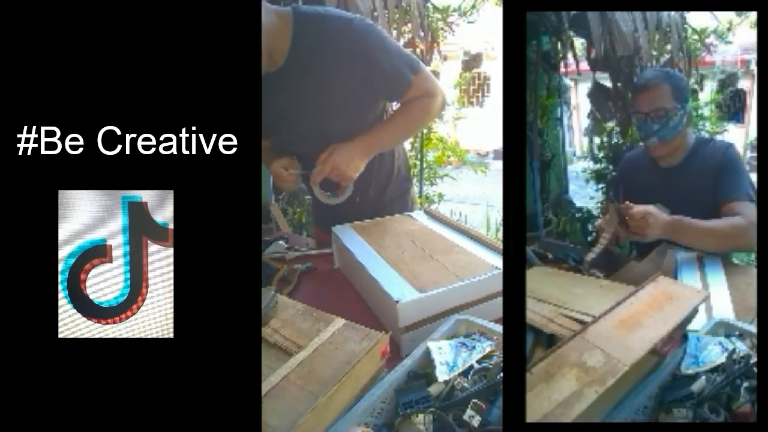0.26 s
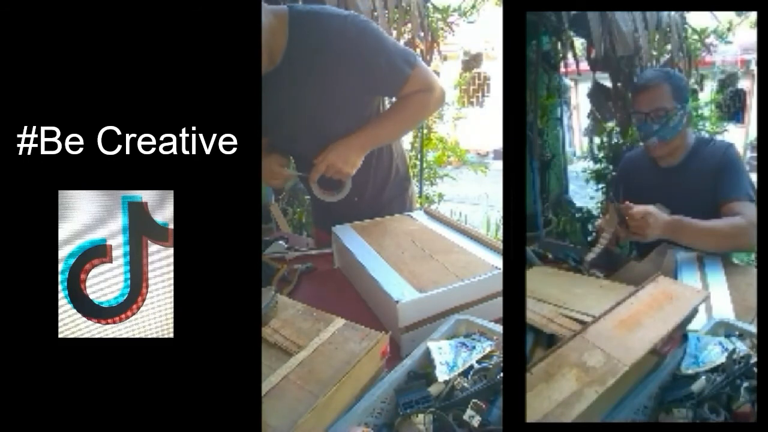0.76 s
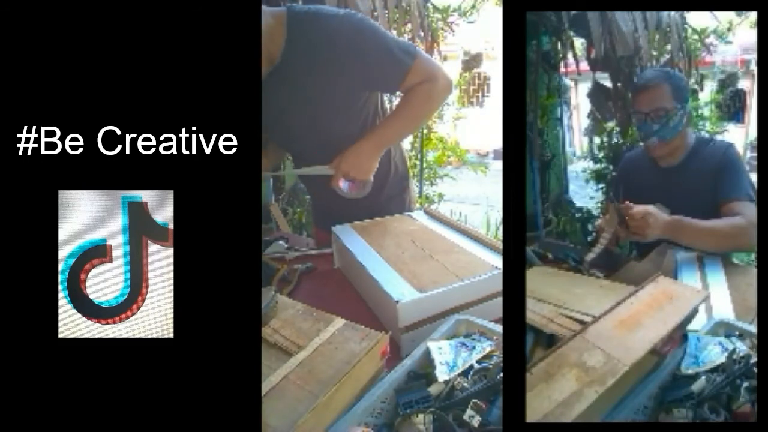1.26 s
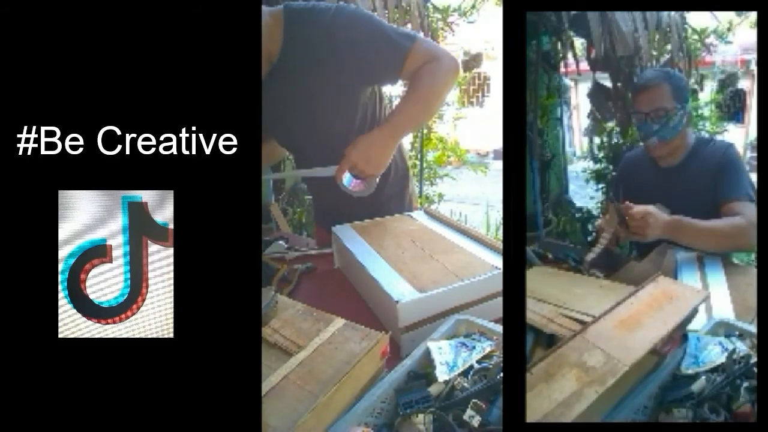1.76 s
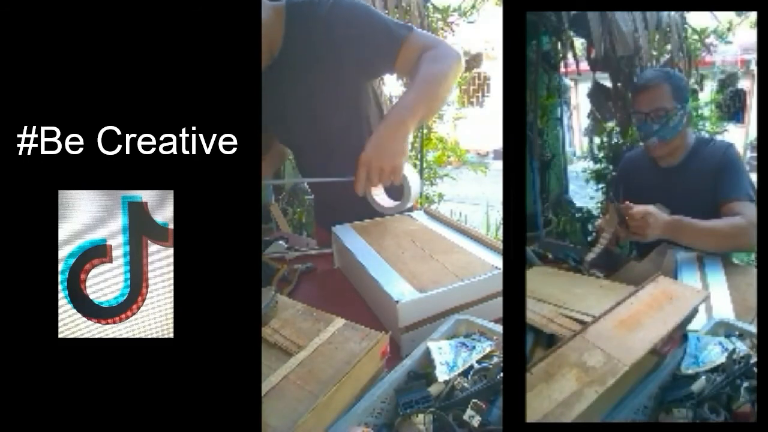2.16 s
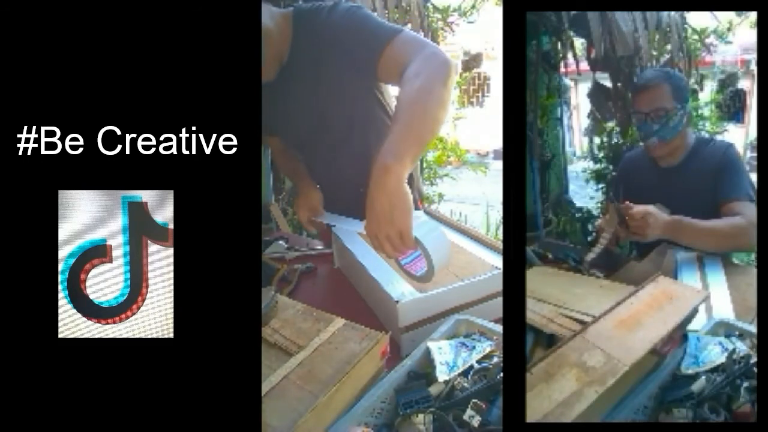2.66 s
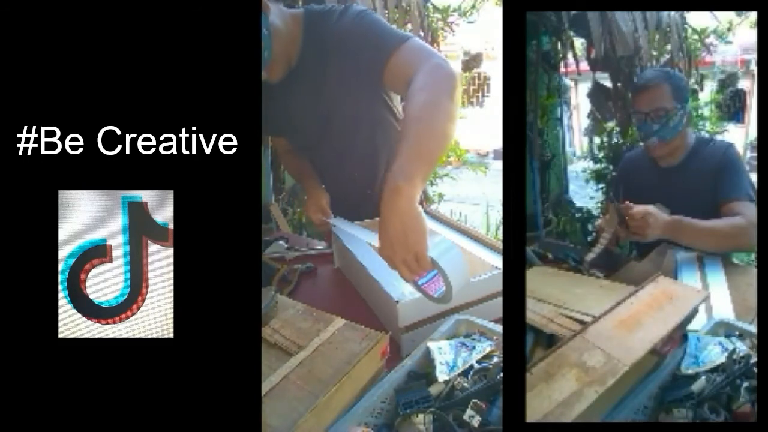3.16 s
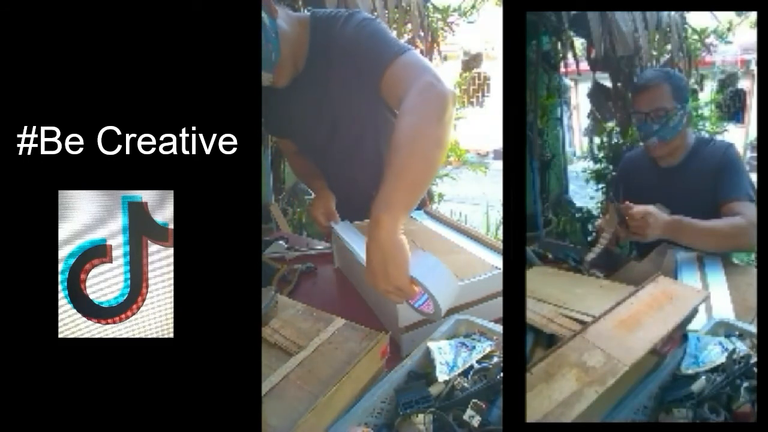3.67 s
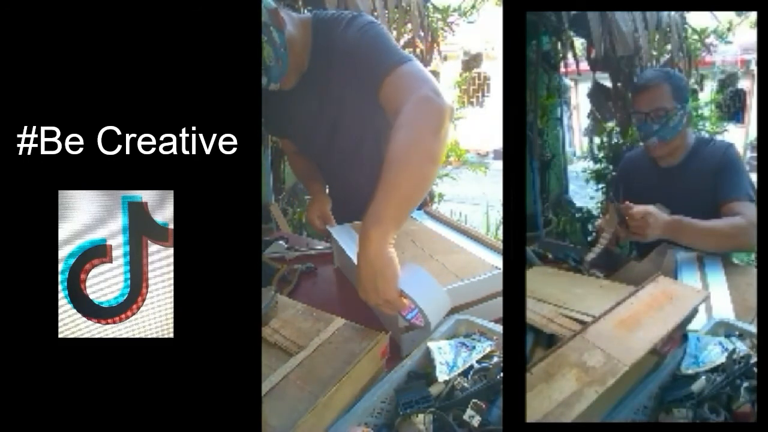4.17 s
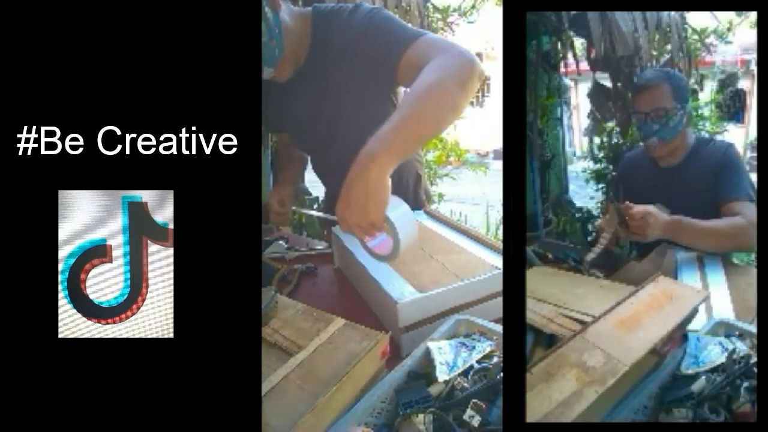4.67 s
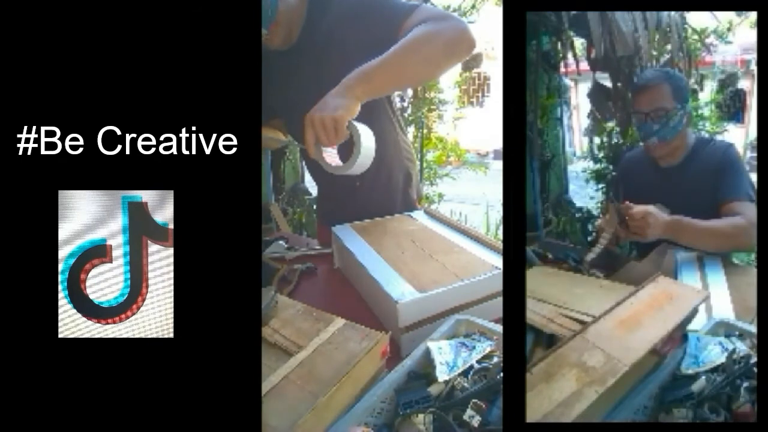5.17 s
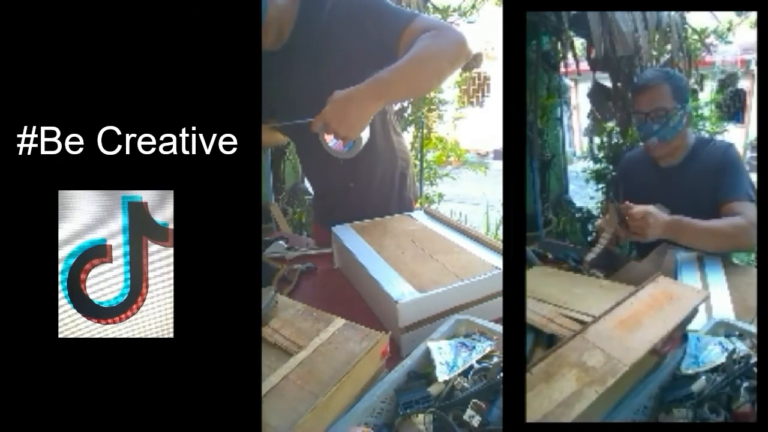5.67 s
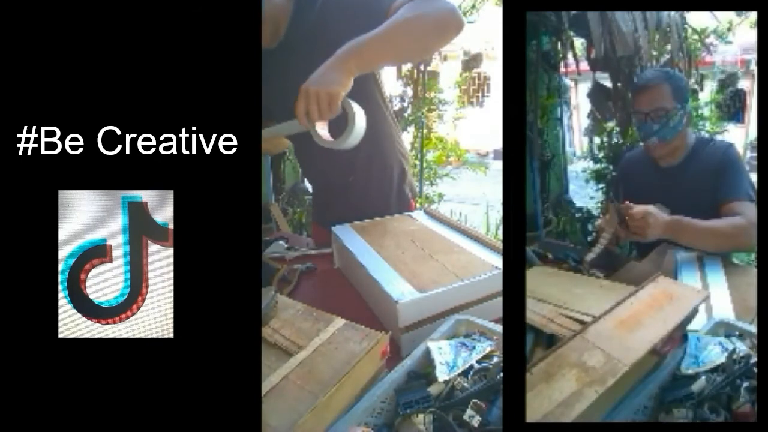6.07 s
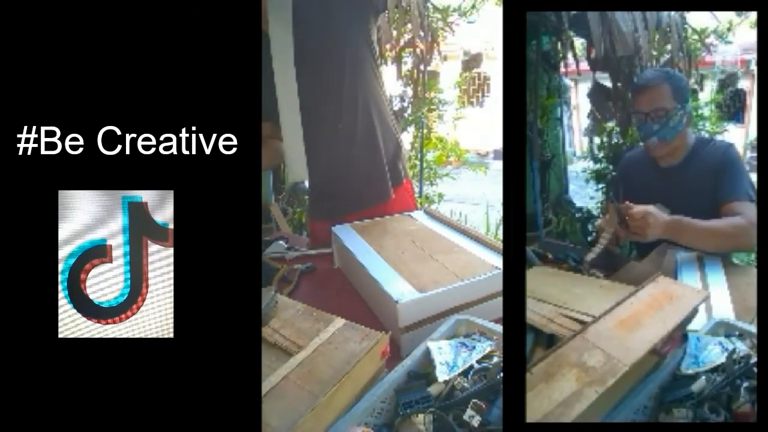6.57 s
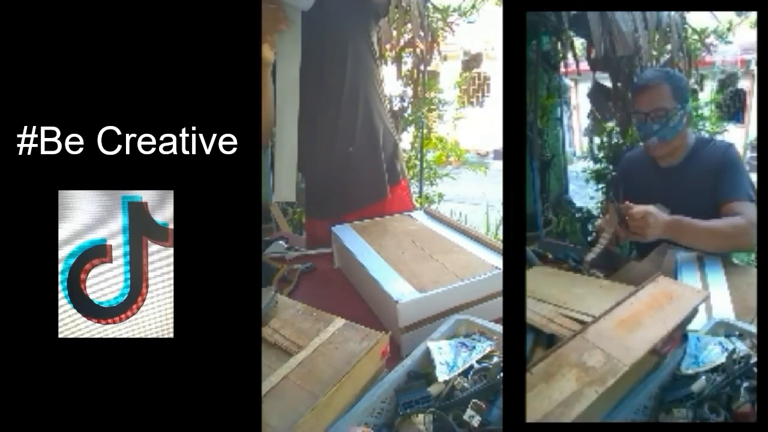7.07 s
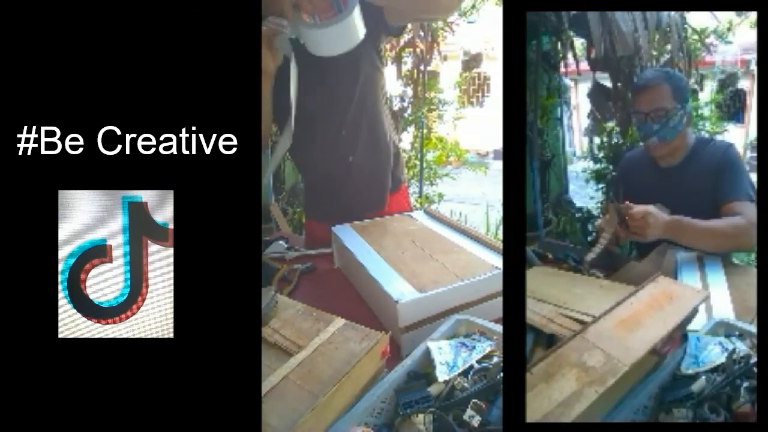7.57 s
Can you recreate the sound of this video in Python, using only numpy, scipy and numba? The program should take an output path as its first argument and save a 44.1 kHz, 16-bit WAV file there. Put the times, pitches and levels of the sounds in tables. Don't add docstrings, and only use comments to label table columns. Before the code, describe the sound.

A nearby rooster's cry breaks off as the tape is picked, then four brisk rips burst from the roll about a third of a second apart. A dull drag and small picks give way to a calmer stretch of wavering distant crows, clucks and thin chirps over low yard hum and a far motor. Hard snaps, one sideways tear and a slow creaking peel finish it, close and dry against the faint open-air background.

```python
import sys
import numpy as np
from scipy import signal
from scipy.io import wavfile
from numba import njit

SR = 44100
rng = np.random.default_rng(int(sys.argv[2]) if len(sys.argv) > 2 else 0)


def boost(x):
    u = np.asarray(x, float) / 20
    return 10 ** u


def wav_record(signal):
    frames = np.transpose(np.atleast_2d(signal))
    bounded = np.clip(frames, -1, 1)
    quanta = np.round(bounded * 32767).astype(np.int16)
    wavfile.write(sys.argv[1], SR, quanta)


N = 344862

# (band_hz, level_db per Hz)
YARD_SPECTRUM = [(20, 3.5), (45, -5), (110, -11.5), (250, -17), (500, -14.5), (900, -14.5), (1300, -20),
                 (1900, -19.5), (2500, -30.5), (4300, -27), (6000, -36), (8000, -55)]
# (time_s, level_db)
YARD_LEVEL = [(0, -48), (.3, -49.5), (1.8, -45), (2.3, -47), (2.9, -51), (3.2, -47.5), (3.6, -47.5),
              (4.0, -46.5), (4.6, -49.5), (5.05, -47.5), (5.2, -54), (5.4, -49.5), (5.9, -52), (6.5, -50),
              (6.9, -51.5), (7.2, -50.5), (7.4, -41.5), (7.82, -48)]
# (centre_s, half_width_s, over_idle_db)
MOTOR_SWELLS = [
    (1.45, .45, 11),
    (3.95, 0.42, 12),
    (6.75, 0.096, 9),
    (7.599, 0.36, 9.5),
]
MOTOR_IDLE_DB = -63.5

# (time_s, pitch_hz, level_db, mouth opening as second_db re first partial)
NEAR_CROW = [(0, 903, -39, 10.5), (.06, 921, -38, 4), (.1, 908, -40, 4.5), (.115, 917, -45.5, 17),
             (.135, 887, -38, 14.5), (.152, 833, -36.5, -1.5), (.19, 689, -51, -3)]
NEAR_HIGH_DB, NEAR_BREAK_S, NEAR_HIGH_FALL_DB_PER_S = -48, 0.11, 1100

# (share of the length, pitch_hz)
SWOOP_SHAPE = [(0, 6300), (.12, 6900), (.3, 6100), (.5, 5250), (.84, 4600), (1, 3900)]
PEEP_SHAPE = [(0, 6600), (.05, 4950), (.4, 4720), (1, 4600)]
DIP_SHAPE = [(0, 4850), (.35, 4570), (.7, 4700), (1, 4720)]
HOOK_SHAPE = [(0, 6500), (.5, 7050), (.8, 6800), (1, 5900)]
SLIDE_SHAPE = [(0, 6000), (.3, 5250), (.72, 4680), (1, 4150)]
DROP_SHAPE = [(0, 4500), (.5, 3700), (1, 2900)]
# (start_s, length_s, pitch_factor, level_db)
SWOOPS = [(2.85, .13, 1, -53), (3.975, .13, .99, -52), (5.37, .13, 1.02, -54)]
# (start_s, length_s, pitch_factor, level_db)
PEEPS = [(0, .1, 1.03, -52), (.43, .1, 1.01, -55), (2.275, .135, 1.02, -52), (2.97, .13, .98, -58),
         (3.36, .14, 1.04, -58), (3.765, .14, .97, -55), (4.675, .115, 1, -56), (1.82, .1, 1.03, -53),
         (7.16, .04, 1.03, -57)]
# (start_s, length_s, pitch_factor, level_db)
DIPS = [(6.6, .16, 1, -56)]
# (start_s, length_s, pitch_factor, level_db)
HOOKS = [(5.97, .09, .99, -68), (3.71, .07, 1.02, -67), (.37, .06, .97, -68), (6.54, .08, 1, -70),
         (.12, .06, 1.03, -64), (3.33, .05, 1.02, -70), (7.02, .055, 1.02, -66), (7.11, .07, 1.02, -69)]
# (start_s, length_s, pitch_factor, level_db)
SLIDES = [(7.058, .095, 1.02, -53)]
# (start_s, length_s, pitch_factor, level_db)
DROPS = [(1.9, .06, 1, -48), (5.81, .055, .99, -46), (3.6, .045, .97, -54), (6.44, .08, .95, -62),
         (4.385, .045, .87, -58), (2.7, .04, .9, -57), (.79, .06, .97, -50), (.3, .06, .95, -62),
         (4.74, .04, .9, -60)]

# (start_s, peak_db, ring_hz, body_db re peak, fizz_db re peak)
PICKS = [(0.035, -23.5, 1850, -12, -20.5), (0.4088, -42, 1760, -1, -10), (2.297, -26.5, 1730, -23, -29),
         (2.7124, -34.5, 1870, 5, -19), (3.3902, -52, 1690, 2, -46), (4.3976, -57, 2157, -2, -34),
         (4.74, -37, 4700, -6, -26), (4.9996, -36, 1590, 4.5, -31), (5.668, -5, 1900, -16.5, -22),
         (5.6814, -8.5, 1890, -7.5, -24), (5.6918, -13.5, 3550, -16, -39), (5.7041, -19.5, 3910, -18, -34),
         (6.164, -17, 2980, -2.5, -21), (6.47, -41, 1652, -10, -40)]
PICK_CYCLES = 56

# (start_s, length_s, start_hz, end_hz, level_db)
CLUCKS = [(2.21, .14, 1000, 1050, -47.5), (2.23, .17, 1680, 1640, -59), (2.47, .08, 450, 440, -49),
          (1.83, .14, 2000, 1950, -57), (3.22, .09, 460, 450, -50), (3.37, .26, 940, 915, -43.5),
          (3.3, .27, 3660, 3600, -69), (3.13, .26, 2310, 2270, -61), (3.64, .14, 2430, 2460, -63),
          (3.9, .2, 1960, 2040, -63), (3.0, .15, 740, 745, -58), (6.42, .16, 1400, 1500, -63),
          (6.3, .1, 1360, 1350, -63), (3.32, .58, 560, 550, -59), (3.99, .11, 460, 440, -50),
          (4.5, .4, 560, 555, -58.5), (4.95, .2, 900, 1080, -57), (6.28, .1, 1170, 1170, -59.5),
          (6.72, .18, 1460, 1430, -60), (6.5, .28, 2060, 2030, -68), (.35, .13, 560, 550, -58.5),
          (7.3, .25, 900, 880, -52), (4.45, .06, 310, 300, -53), (4.78, .05, 300, 290, -53),
          (2.6, .08, 470, 450, -56), (3.4, .07, 470, 450, -53), (3.62, .45, 1040, 1050, -61.5),
          (1.55, .05, 1850, 1850, -52), (2.5, .15, 1980, 1950, -66)]

# (start_s, attack_s, hold_s, crackle_db, swell_db over the hold)
PULLS = [
    (.529, 0.011, 0.055, -16.5, 3),
    (.887, 0.0059, 0.062, -15.5, 2.5),
    (1.225, 0.0062, 0.093, -16, 3.5),
    (1.591, .004, 0.066, -21, 8.5),
    (7.197, 0.016, 0.029, -9.5, -5),
]
# (mode_hz, width_hz, level_db)
ROLL_MODES = [
    [(1496, 76, -6), (2070, 570, -8.5)],
    [(2430, 150, -6), (2880, 180, -0.5), (3310, 210, -8)],
    [(3710, 170, -3.5), (4240, 140, -12), (5580, 540, -11), (6220, 680, -9.5)],
]
# (low_db, middle_db, high_db, fizz_db, fizz_flare_s)
GRIP = [(-2.5, -5.5, -4, -21.5, 0.032), (-6.5, -6.5, -8.5, -21.5, 0.035), (-2, -3, -5, -19.5, 0.057),
        (-0.5, -5.1, -1, -24.5, 0.044), (-3, -4, 3.5, -20.5, 0.047)]
# (first_db, lead_in_db re boom, first_end_hz, second_db, second_hz)
STRIP = [(-18.5, -5.5, 265, -12.5, 900), (-13, -14, 405, -11.5, 760), (-15, 0.5, 253, -13, 900),
         (-18, -12, 222, -18.5, 965), (-30.5, -14, 375, -26.5, 1250)]
FIZZ_TOP_HZ = [15500, 15500, 15500, 15500, 11800]
PULL_ONSET_DB, PULL_RELEASE_S, PULL_RELEASE_DB = -7.5, 0.0074, -32
RELEASE_SHARE = 0.28
RISE_DB_PER_S = 1202
TAUT_S, STRIP_START_HZ = 0.037, 446
FIRST_FALL_DB_PER_S, SECOND_FALL_DB_PER_S, SECOND_LEAD_DB = 165.5, 336.5, -18.5
FIZZ_TAUT_DB, FIZZ_TAUT_S = 7, 0.03

# (start_s, peak_db)
SNAPS = [(0.5456, -8), (0.5515, -0.5), (0.558, -10.5), (0.564, -9), (0.57, -8), (0.5782, 1), (0.5855, -5),
         (0.5907, 4), (0.5963, -9), (0.8955, -4), (0.9035, -6), (0.9115, -4), (0.921, -7), (0.927, -4.5),
         (0.9326, -3.0), (0.939, -2.5), (0.9485, -0.5), (0.9528, -2.5), (0.9725, -12), (1.2477, -19.5),
         (1.257, -12), (1.2614, -5), (1.2677, -9.5), (1.2769, -3.5), (1.293, -5.5), (1.2996, -6),
         (1.304, -1), (1.3086, -3.5), (1.3153, 2), (1.3237, -5.5), (1.3298, -5), (1.3352, 2), (1.6039, -7),
         (1.609, -15.5), (1.6149, -8), (1.6261, -6), (1.6333, -1.5), (1.6374, -1), (1.6513, -8),
         (1.659, -8), (1.6687, -7), (7.2132, 5), (7.2176, 2.8), (7.2244, -2.2), (7.2295, -5.4),
         (7.2335, -6), (7.2381, -4), (7.2445, 7), (7.2554, -25), (7.2602, -17)]
SNAP_DB, SNAP_RING_HZ, SNAP_SPREAD = -2.5, 3000, 0.21

# (start_s, attack_s, hold_s, level_db)
PUSHES = [
    (.9, 0.049, 0.041, -32),
    (1.23, 0.028, 0.091, -30),
    (1.595, 0.014, 0.13, -36),
]
# (start_s, attack_s, hold_s, level_db)
FLAPS = [
    (1.488, 0.0084, 0.038, -40),
    (1.86, 0.017, 0.09, -33.5),
]
# (start_s, attack_s, hold_s, level_db)
RUB = (1.988, .004, .052, -30.5)
# (start_s, length_s, pitch_hz, level_db)
WHINE = [(2.1, 1.2, 3985, -74), (6.88, .3, 3960, -76)]

# (time_s, pitch_hz)
CROW_A_PITCH = [(3.1, 770), (3.17, 801), (3.32, 764), (3.44, 839.4), (3.6, 792), (3.72, 826.4), (3.92, 777),
                (4.12, 750.7), (4.45, 733.5), (4.88, 608)]
CROW_B_PITCH = [(5.34, 863.5), (5.6, 870), (5.75, 894), (5.93, 883), (6.1, 891.4), (6.33, 866), (6.45, 819),
                (6.6, 821), (6.7, 786), (6.9, 768)]
# (start_s, length_s, level_db, second_db re first partial, third_db re first)
SYLLABLES_A = [(3.118, 0.19, -47.5, -3.5, -8.5), (3.346, 0.25, -47.5, -6, -15),
               (3.587, 0.25, -43.5, -5, -23), (4.123, .3, -45.5, -10.5, -15), (4.45, 0.38, -54, -8, -3.5)]
SYLLABLES_B = [(5.36, 0.22, -55.5, 4.5, -17), (5.67, 0.25, -53, -9, -28), (5.91, 0.43, -48.5, -4.5, -32.5),
               (6.21, 0.094, -63, -3, -26.5), (6.44, 0.13, -52, -4.5, -22), (6.62, .07, -56.5, 5, -22.5),
               (6.72, 0.11, -55.5, -1.5, -33)]
SYLLABLE_EDGE_S, SYLLABLE_EDGE_DB, SYLLABLE_SAG_DB = .035, -10, -3

# (time_s, level_db, ring_hz)
CREAK = [(7.3, -69, 3620), (7.425, -66, 3600), (7.445, -41, 3500), (7.53, -41, 3150), (7.605, -39.5, 3000),
         (7.625, -40, 2400), (7.74, -42, 2100), (7.775, -41, 2400), (7.82, -44.5, 2450)]
# (start_s, peak_db)
CREAK_SLIPS = [(7.384, -42), (7.438, -30), (7.4428, -24), (7.4616, -17.5), (7.4897, -34), (7.511, -16),
               (7.5296, -28), (7.5423, -12.5), (7.558, -24), (7.568, -19), (7.581, -23), (7.6, -18),
               (7.6224, -17.5), (7.633, -18), (7.6484, -28), (7.6742, -21), (7.707, -26), (7.7196, -24),
               (7.7599, -36), (7.775, -22)]
OVER_FROM_S, OVER_START_HZ, OVER_FALL_HZ_PER_S, OVER_DB, OVER_RISE_DB_PER_S = 7.55, 7150, 14400, -19.5, 60


def level(x):
    return x / np.sqrt(np.mean(x ** 2) + 1e-20)


def band(x, low_hz, high_hz):
    return signal.sosfilt(signal.butter(2, [low_hz, high_hz], "band", fs=SR, output="sos"), x)


def low_pass(x, top_hz):
    return signal.sosfilt(signal.butter(10, top_hz, fs=SR, output="sos"), x)


def span(rows):
    s, *columns = np.transpose(rows)
    t = np.arange(max(round(s[0] * SR), 0), min(round(s[-1] * SR), N))
    return t[0], [np.interp(t / SR, s, c) for c in columns]


def add(track, start, sound, fade_s=0.0018):
    n = np.arange(min(len(sound), len(track) - start))
    fade = np.clip(np.minimum(n, len(sound) - n) / (fade_s * SR), 0, 1)
    track[start:start + len(n)] += sound[:len(n)] * fade


def stroke(attack_s, hold_s, release_s, onset_db, swell_db, release_db):
    knots = np.cumsum(np.maximum([0, attack_s, hold_s, release_s], [0, 1e-3, 1e-3, 1e-3]))
    t = np.arange(int(knots[-1] * SR)) / SR
    return np.interp(t, knots, [onset_db, 0, swell_db, swell_db + release_db])


@njit
def swept(x, turn, r):
    y = np.zeros(len(x) + 2)
    for i in range(2, len(x)):
        push = (1 - r[i] ** 2) / 2 * (x[i] - x[i - 2])
        y[i] = push + 2 * r[i] * np.cos(turn[i]) * y[i - 1] - r[i] ** 2 * y[i - 2]
    return y[:len(x)]


def resonate(x, hz, width_hz):
    ones = np.ones(len(x))
    return swept(x, 2 * np.pi * hz / SR * ones, np.exp(-np.pi * width_hz / SR) * ones)


def twice(x, hz, width_hz):
    return level(resonate(resonate(x, hz, width_hz), hz, width_hz))


def drift(size, rate):
    knots = rng.standard_normal(int(size * 400 / SR) + 3)
    coarse = np.arange(0, size + 16, 16)
    wander = np.interp(coarse * 400 / SR, np.arange(len(knots)), knots)
    slow = resonate(wander, 8 * rate, 32 * rate)
    return level(np.interp(np.arange(size), coarse, slow))


def slips(size, per_s, spread_db, clump_db):
    born = rng.random(size) < per_s / SR
    sizes = boost(spread_db * np.minimum(rng.exponential(1, size), 4)) * rng.choice([-1, 1], size)
    return level(born * sizes * boost(clump_db * drift(size, 150)))


def voice(hz, partials, waver, throb_db):
    phase = 2 * np.pi * np.cumsum(hz * (1 + waver * drift(len(hz), 30))) / SR
    return sum(np.sqrt(2) * boost(db + throb_db * drift(len(hz), 21)) * np.sin(m * phase) for m, db in partials)


def yard():
    white, out, together = rng.standard_normal((2, N)), 0, drift(N, 1.65)
    edges = 20 * 2 ** np.arange(0, 8.7, 1 / 3)
    hz, db = np.transpose(YARD_SPECTRUM)
    patch = {octave: drift(N, 12) for octave in range(4, 15)}
    start, (level_db,) = span(YARD_LEVEL)
    bustle_db = level_db - np.median(level_db)
    for k, (low, high) in enumerate(zip(edges, edges[1:])):
        centre = np.sqrt(low * high)
        lively = np.clip(np.log2(centre / 150), 0, 1)
        octave_db = 0.9 * patch[int(np.log2(centre))]
        swell_db = lively * (bustle_db + 1.2 * together + octave_db + 1.6 * drift(N, 5))
        band_db = np.interp(np.log(centre), np.log(hz), db)
        out = out + boost(band_db + swell_db) * band(white[k % 2], low, high)
    gate = np.clip(8 * (drift(N, 9) + 1.35), .03, 1)
    hiss = gate * level(band(white[0], 8100, 19000))
    return boost(-50.5) * low_pass(level(out), 7000) + boost(-79.0) * hiss


def far_motor():
    t = np.arange(N) / SR
    swells = sum(swell_db * np.exp(-((t - s) / width_s) ** 2) for s, width_s, swell_db in MOTOR_SWELLS)
    return boost(MOTOR_IDLE_DB + swells) * twice(rng.standard_normal(N), 68, 9)


def near_rooster():
    out = np.zeros(N)
    start, (hz, first_db, open_db) = span(NEAR_CROW)
    t = np.arange(len(hz)) / SR
    sixth_db = NEAR_HIGH_DB - NEAR_HIGH_FALL_DB_PER_S * np.maximum(t - NEAR_BREAK_S, 0)
    stutter = 1 - .85 * np.clip((t - .095) / .025, 0, 1) * np.cos(np.pi * (t - .126) * 66) ** 2
    partials = [(1, first_db), (2, first_db + open_db), (3, sixth_db - 21), (4, sixth_db - 13),
                (5, sixth_db - 20), (6, sixth_db), (7, sixth_db - 14.5)]
    add(out, start, stutter * voice(hz, partials, waver=.002, throb_db=1), fade_s=.0005)
    hoarse_air = level(band(rng.standard_normal(len(t)), 3100, 5100))
    add(out, start, boost(-56) * hoarse_air, fade_s=.02)
    return out


def birds():
    out = np.zeros(N)
    families = ((SWOOP_SHAPE, SWOOPS, .55), (PEEP_SHAPE, PEEPS, .6), (DIP_SHAPE, DIPS, .6),
                (HOOK_SHAPE, HOOKS, 1.5), (SLIDE_SHAPE, SLIDES, .55), (DROP_SHAPE, DROPS, 5))
    for shape, calls, breath in families:
        for s, length, factor, db in calls:
            share = np.linspace(0, 1, round(length * SR))
            hz = factor * np.interp(share, *np.transpose(shape))
            tone = voice(hz, [(1, 0)], waver=0.0065, throb_db=1.5)
            tone = tone + breath * twice(rng.standard_normal(len(hz)), hz, 130 + 150 * breath)
            rising_db = db + 6.5 - 7.4 * (1.89 - np.minimum(share, .7))
            add(out, round(s * SR), boost(rising_db) * level(tone), fade_s=0.0072)
    return out


def picks():
    out = np.zeros(N)
    for s, db, hz, body_db, fizz_db in PICKS:
        burst = rng.standard_normal(4000)
        burst[30] = 6.6
        body = boost(body_db + 3.5) * level(band(burst, 250, 1500))
        colour = twice(burst, hz, .5 * hz) + 1.15 * twice(burst, 3790, 2100) + body
        colour = low_pass(colour, 7200) + boost(fizz_db) * twice(burst, 9440, 4500)
        decay_db = 60 * np.arange(4000) / SR * hz / PICK_CYCLES
        add(out, round(s * SR), boost(db - 16.5 - decay_db) * colour, fade_s=0.00027)
    return out


def clucks():
    out = np.zeros(N)
    for s, length, start_hz, end_hz, db in CLUCKS:
        hz = np.linspace(start_hz, end_hz, round(length * SR))
        cluck = voice(hz, [(1, db), (2, db - 13.5)], waver=0.021, throb_db=4.0)
        add(out, round(s * SR), cluck, fade_s=0.025)
    return out


def roll_crackle(drive, grip):
    size, roll, sign = len(drive), 0, 1
    for group, grip_db in zip(ROLL_MODES, grip):
        local = .6 * drive + slips(size, per_s=4500, spread_db=3.5, clump_db=1)
        for hz, width_hz, db in group:
            passing = boost(db + grip_db + 3.45 * drift(size, 30))
            moving_hz = hz * (1 + .045 * drift(size, 12))
            roll = roll + sign * resonate(passing * local, moving_hz, max(width_hz, 330))
            sign = -sign
    bare_snaps = level(band(drive, 1200, 5500))
    return level(band(level(roll) + .6 * bare_snaps, 680, 6300))


def pull_fizz(drive, top_hz):
    edges = np.geomspace(7200, top_hz, 5)
    hiss = drive + .6 * rng.standard_normal(len(drive))
    return level(sum(band(hiss * boost(3.5 * drift(len(drive), 30)), low, high)
                     for low, high in zip(edges, edges[1:])))


def pulls():
    out = np.zeros(N)
    for pull, strip_row, grip_row, top_hz in zip(PULLS, STRIP, GRIP, FIZZ_TOP_HZ):
        s, attack_s, hold_s, db, swell_db = pull
        first_db, lead_db, end_hz, second_db, second_hz = strip_row
        *grip, fizz_db, flare_s = grip_row
        release_s = PULL_RELEASE_S + RELEASE_SHARE * hold_s
        onset_db = PULL_ONSET_DB - RISE_DB_PER_S * attack_s
        crackle_db = db + stroke(attack_s, hold_s, release_s, onset_db, swell_db, PULL_RELEASE_DB)
        t = np.arange(len(crackle_db)) / SR
        before_taut = np.clip(1 - t / TAUT_S, 0, 1)
        after_taut = np.maximum(t - TAUT_S, 0)
        ended = np.maximum(t - attack_s - hold_s, 0) / release_s
        drive = slips(len(t), per_s=3000, spread_db=3.5, clump_db=1.5)
        crackle = roll_crackle(drive, grip)

        first_hz = np.interp(t, [0, attack_s + hold_s], [STRIP_START_HZ, end_hz])
        first = twice(drive, first_hz, 0.4 * first_hz)
        first = level(first + 0.21 * twice(drive, 289.0, 65) + 0.54 * twice(drive, 628, 130))
        second = twice(drive, second_hz, 0.42 * second_hz)
        first_db = first_db + lead_db * before_taut - FIRST_FALL_DB_PER_S * after_taut - 13 * ended
        second_db = second_db + SECOND_LEAD_DB * before_taut - SECOND_FALL_DB_PER_S * after_taut - 11 * ended
        strip = boost(first_db) * first + boost(second_db) * second

        flare_db = FIZZ_TAUT_DB * np.exp(-((t - flare_s) / FIZZ_TAUT_S) ** 2)
        fizz = boost(fizz_db + flare_db) * pull_fizz(drive, top_hz)
        add(out, round(s * SR), boost(-2.0) * (boost(crackle_db) * (crackle + fizz) + strip), fade_s=.0008)
    return out


def snaps():
    out, click = np.zeros(N), np.zeros(400)
    click[20] = 1
    for (s, db), (pitch, sign) in zip(SNAPS, rng.standard_normal((len(SNAPS), 2))):
        hz = SNAP_RING_HZ * np.exp(SNAP_SPREAD * np.clip(pitch, -2, 2))
        sound = twice(click, hz, 900) + 0.9 * level(band(click, 510, 6500))
        sound = sound + .2 * level(band(click, 7000, 10000))
        peak = np.sign(sign + .4) * boost(min(db, -1) + SNAP_DB)
        add(out, round(s * SR) - 24, peak * sound / np.abs(sound).max(), fade_s=.0003)
    return out


def air_pushes():
    out = np.zeros(N)
    for s, attack_s, hold_s, db in PUSHES:
        shape = boost(db + stroke(attack_s, hold_s, 0.031, onset_db=-22.5, swell_db=-15.0, release_db=-30.0))
        add(out, round(s * SR), shape * twice(rng.standard_normal(len(shape)), 110, 110), fade_s=.01)
    return out


def flaps():
    out = np.zeros(N)
    for s, attack_s, hold_s, db in FLAPS:
        shape = boost(db + stroke(attack_s, hold_s, 0.031, onset_db=-15, swell_db=-5.5, release_db=-9.0))
        push = slips(len(shape), per_s=330, spread_db=-3.5, clump_db=3.5)
        add(out, round(s * SR), shape * (level(band(push, 80, 263)) + 0.14 * twice(push, 860, 900)))
    return out


def rub():
    out = np.zeros(N)
    s, attack_s, hold_s, db = RUB
    db = db + stroke(attack_s, hold_s, 0.032, onset_db=-6, swell_db=4.5, release_db=-16.0)
    upper_db = np.linspace(-30, -9, len(db))
    drive = slips(len(db), per_s=2300, spread_db=2.0, clump_db=-0.5)
    body = twice(drive, 895, 830) + 0.49 * twice(drive, 1360, 390)
    drag = low_pass(level(body) + boost(upper_db) * twice(drive, 3430, 560), 5800)
    add(out, round(s * SR), boost(db) * drag, fade_s=0.0013)
    return out


def insect():
    out = np.zeros(N)
    for s, length, hz, db in WHINE:
        steady_hz = np.full(round(length * SR), hz)
        add(out, round(s * SR), voice(steady_hz, [(1, db)], waver=0.0018, throb_db=3.5), fade_s=0.11)
    return out


def far_roosters():
    out = np.zeros(N)
    for pitch, syllables in ((CROW_A_PITCH, SYLLABLES_A), (CROW_B_PITCH, SYLLABLES_B)):
        for s, length, db, second_db, third_db in syllables:
            db = db + stroke(SYLLABLE_EDGE_S, length - SYLLABLE_EDGE_S, SYLLABLE_EDGE_S,
                             SYLLABLE_EDGE_DB, SYLLABLE_SAG_DB, SYLLABLE_EDGE_DB)
            hz = np.interp(s + np.arange(len(db)) / SR, *np.transpose(pitch))
            partials = [(1, db), (2, db + second_db), (3, db + third_db), (4, db + third_db - 18.0)]
            add(out, round(s * SR), voice(hz, partials, waver=.009, throb_db=3.0), fade_s=.012)
            hoarse_air = level(band(rng.standard_normal(len(db)), 1530, 3300))
            add(out, round(s * SR), boost(db - 19) * hoarse_air, fade_s=0.016)
    return out


def creak():
    out = np.zeros(N)
    start, (level_db, ring_hz) = span(CREAK)
    size = len(ring_hz)
    late = np.maximum((start + np.arange(size)) / SR - OVER_FROM_S, 0)
    over_hz = OVER_START_HZ - OVER_FALL_HZ_PER_S * late
    over_db = OVER_DB + OVER_RISE_DB_PER_S * late
    fine = slips(size, per_s=650, spread_db=2.2, clump_db=2) * boost(level_db)
    large = np.zeros(size)
    large[[round(s * SR) - start for s, db in CREAK_SLIPS]] = boost(np.array(CREAK_SLIPS)[:, 1] + 5.5)
    drive = fine + large
    rings = twice(drive * boost(1.0 * drift(size, 31)), ring_hz, 990)
    rings = rings + boost(over_db + 2.0 * drift(size, 27)) * twice(drive, over_hz, 1100)
    rings = rings + 0.16 * twice(drive, 1150, 790) + 0.025 * twice(drive, 8900, 3800)
    dealt = rng.integers(0, 8, size)
    flecks = large + .4 * fine
    for k, hz in enumerate(np.geomspace(5200, 9800, 8)):
        rings = rings + 0.02 * twice(flecks * (dealt == k), hz, 700)
    rings = signal.sosfilt(signal.butter(2, 8000, fs=SR, output="sos"), rings)
    add(out, start, np.std(drive) * rings)
    return out


def echoes(x, t60, low_hz, high_hz):
    t, hop, out = np.arange(int(.8 * SR)) / SR, int(.35 * SR), np.zeros(N + 3 * SR)
    padded = np.pad(x, (hop, 2 * hop))
    fade = np.sin(np.pi * np.arange(2 * hop) / (2 * hop))
    for i in range(0, N + hop, hop):
        scatter = band(rng.standard_normal(len(t)), low_hz, high_hz)
        tail = scatter * boost(-60 * t / t60) * np.clip(t / 0.0029, 0, 1)
        tail = tail / np.sqrt(np.sum(tail ** 2))
        add(out, i, signal.fftconvolve(padded[i:i + 2 * hop] * fade, tail))
    return out[hop:hop + N]


def scene():
    background = yard() + far_motor()
    crow = near_rooster()
    chirps = birds() + insect()
    fowl = clucks() + far_roosters()
    tape = picks() + pulls() + snaps() + air_pushes() + flaps() + rub() + creak()
    near_walls = echoes(boost(-9.5) * tape + boost(-9) * chirps, t60=0.11, low_hz=301, high_hz=10600)
    near_walls = near_walls + echoes(boost(-15.5) * tape, t60=0.19, low_hz=7500, high_hz=14000)
    far_send = boost(-20) * tape + boost(-10.5) * crow + boost(-10.5) * fowl + boost(-14.0) * chirps
    far_walls = echoes(far_send, t60=0.57, low_hz=296, high_hz=6300)
    far_walls = low_pass(far_walls, 5100)
    return (tape + crow + 0.74 * fowl + chirps + near_walls + far_walls + background)[None]


def roll_off(x):
    return signal.sosfilt(signal.butter(12, 16650, fs=SR, output="sos"), x)


def record(dry):
    rounded = .93 * np.tanh(dry / .86)
    cut = signal.cheby2(12, 70, 16500, fs=SR, output="sos")
    mix = signal.sosfilt(cut, rounded)
    return roll_off(mix)


dry = scene()
out = record(dry)
wav_record(out)
```